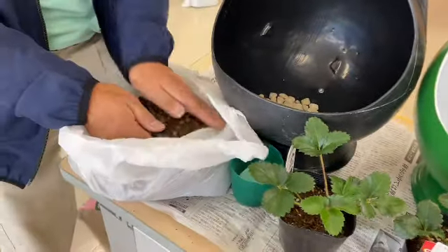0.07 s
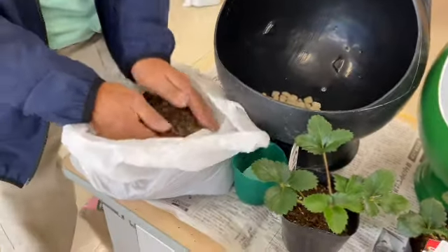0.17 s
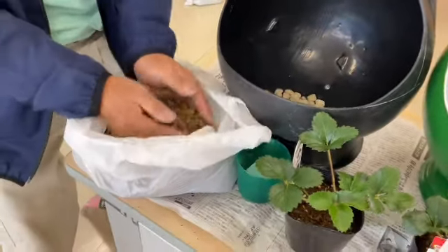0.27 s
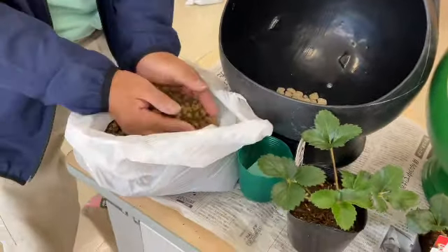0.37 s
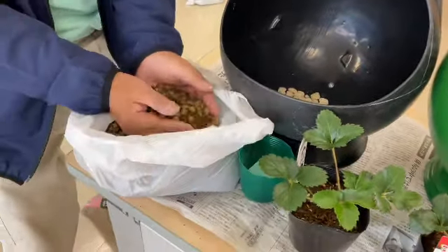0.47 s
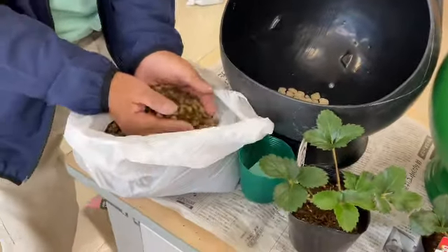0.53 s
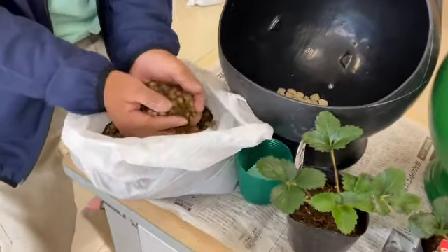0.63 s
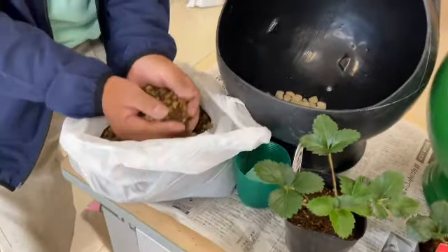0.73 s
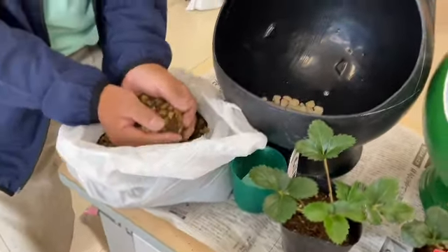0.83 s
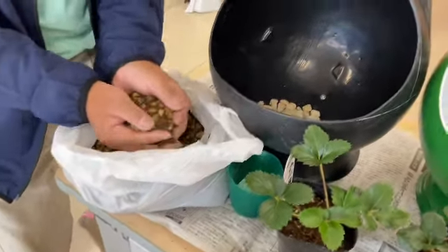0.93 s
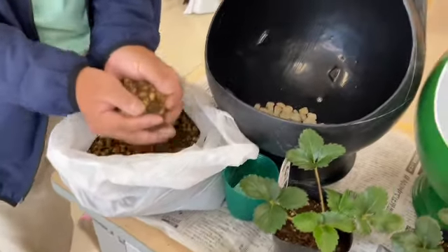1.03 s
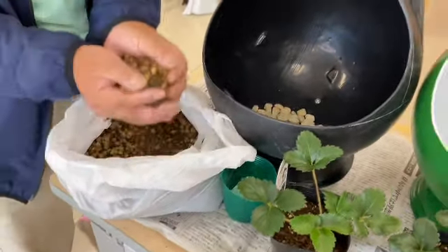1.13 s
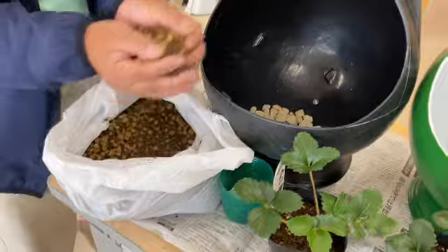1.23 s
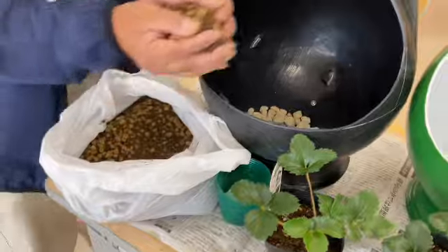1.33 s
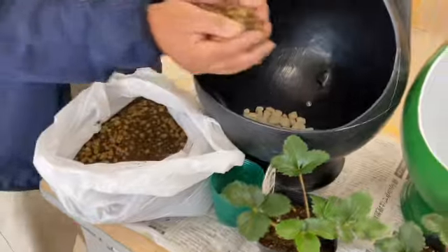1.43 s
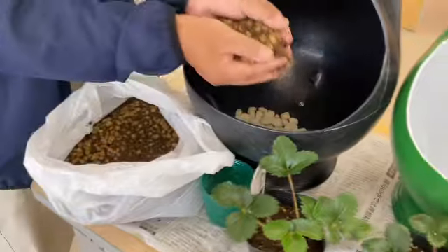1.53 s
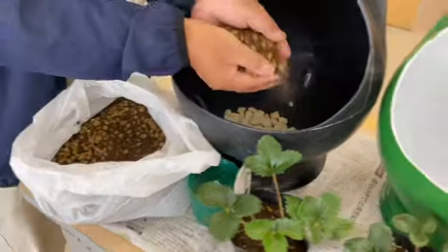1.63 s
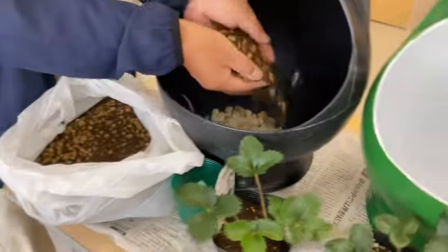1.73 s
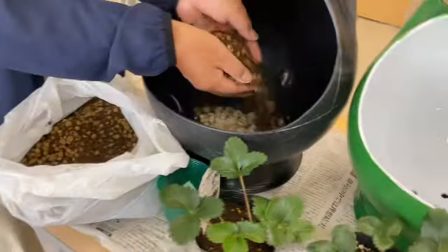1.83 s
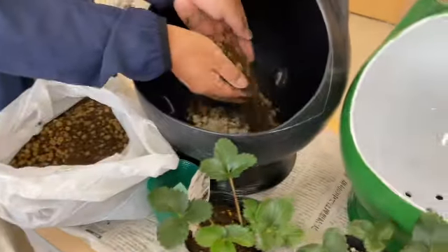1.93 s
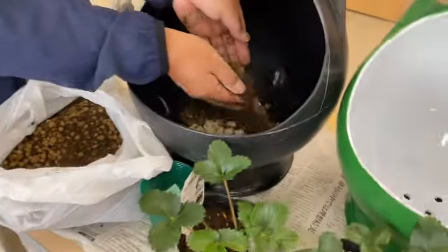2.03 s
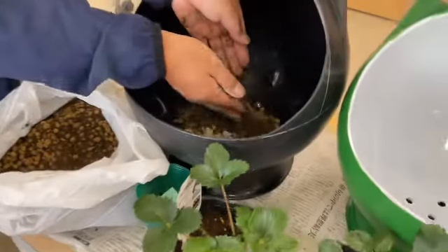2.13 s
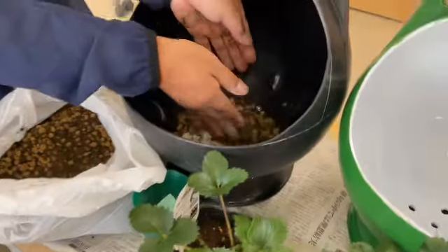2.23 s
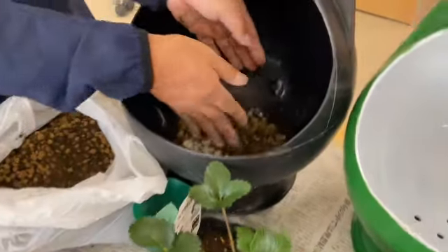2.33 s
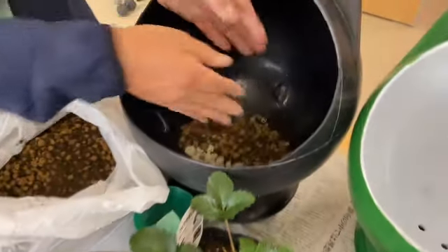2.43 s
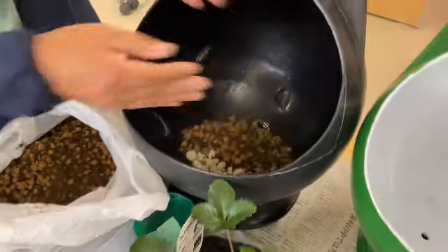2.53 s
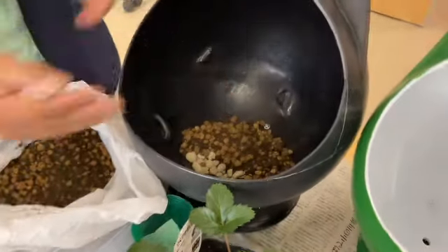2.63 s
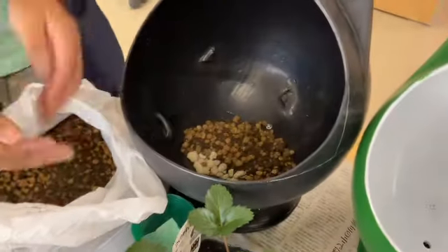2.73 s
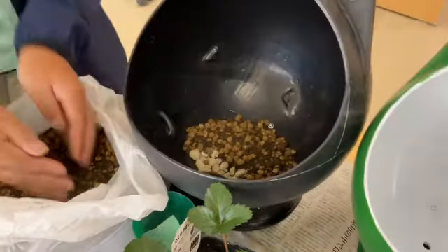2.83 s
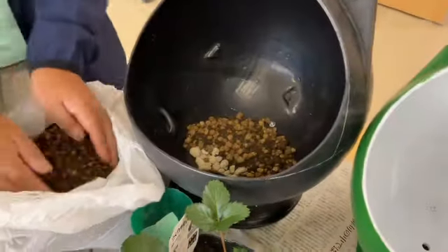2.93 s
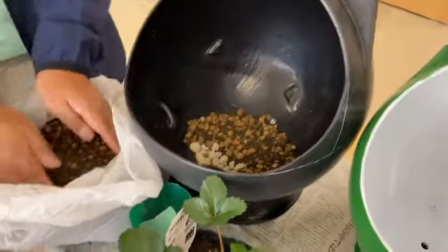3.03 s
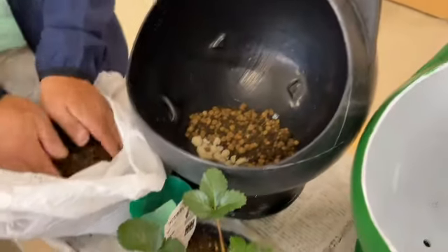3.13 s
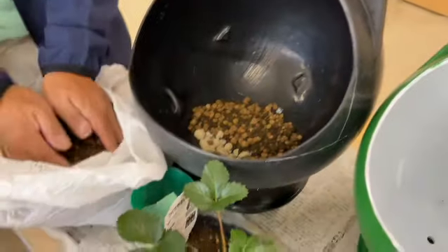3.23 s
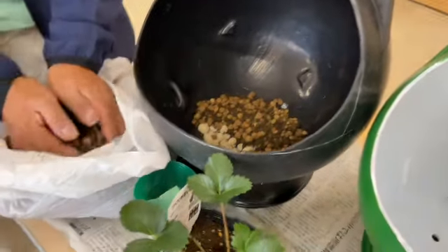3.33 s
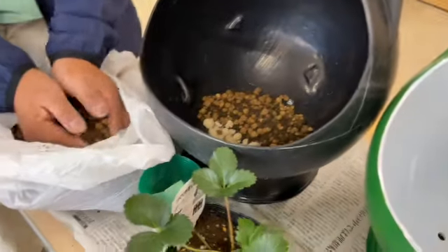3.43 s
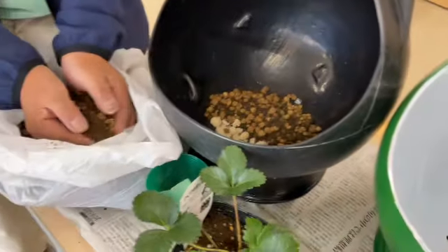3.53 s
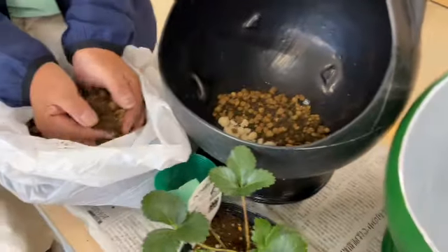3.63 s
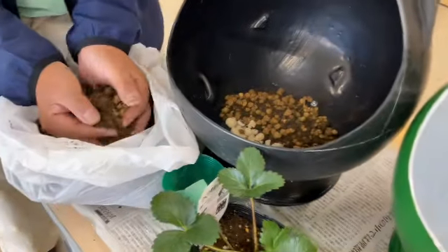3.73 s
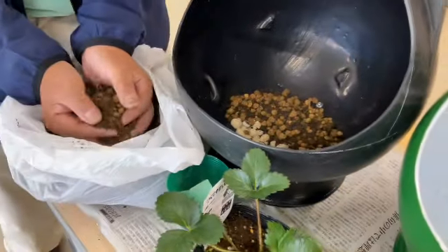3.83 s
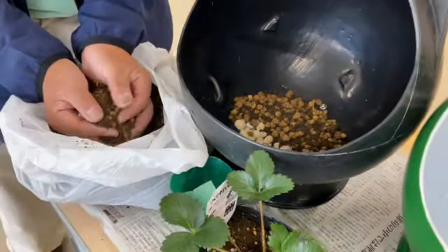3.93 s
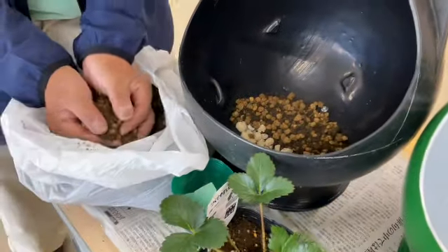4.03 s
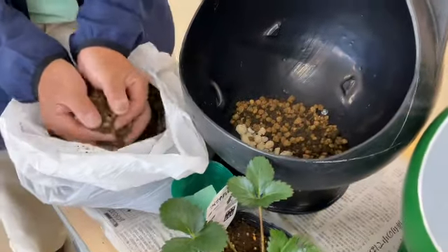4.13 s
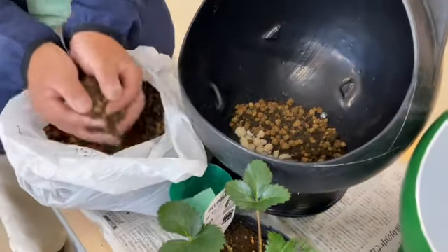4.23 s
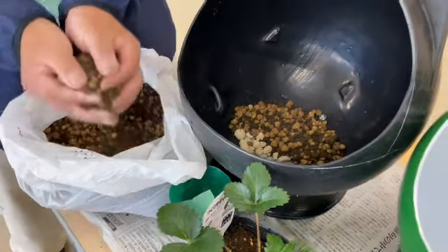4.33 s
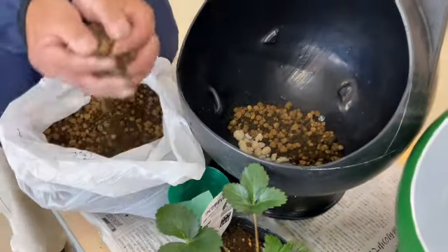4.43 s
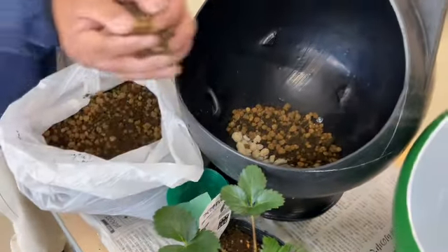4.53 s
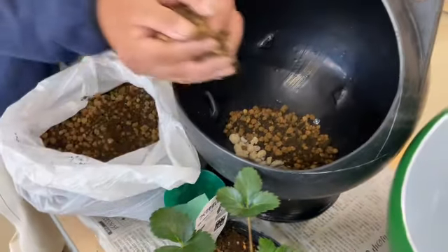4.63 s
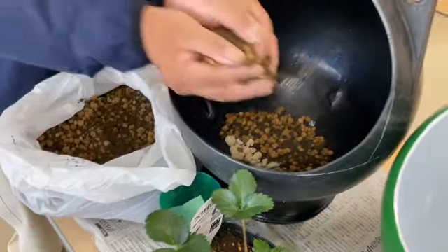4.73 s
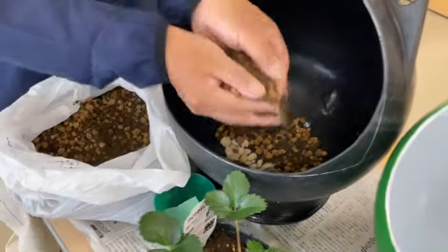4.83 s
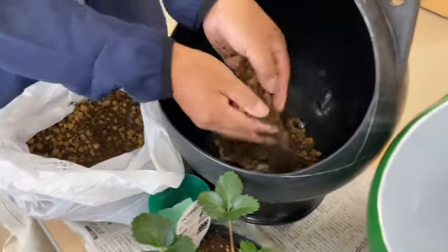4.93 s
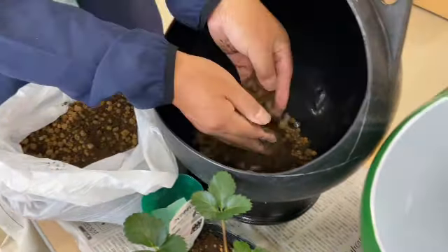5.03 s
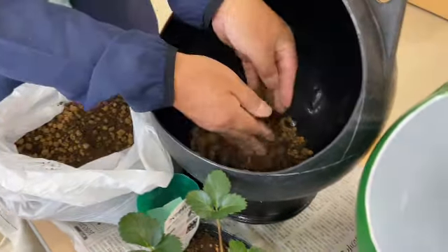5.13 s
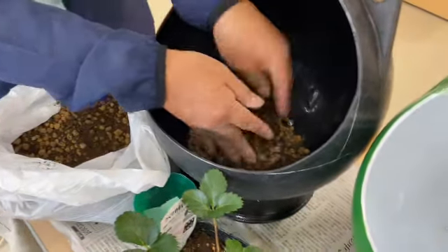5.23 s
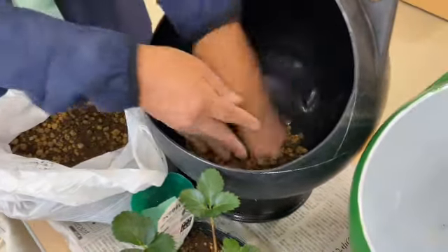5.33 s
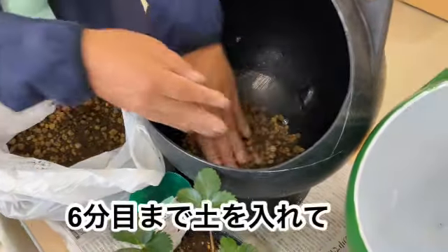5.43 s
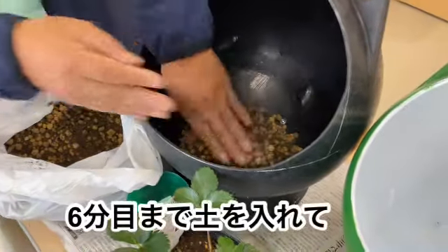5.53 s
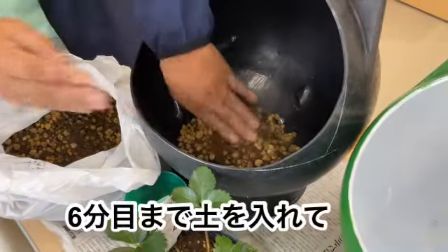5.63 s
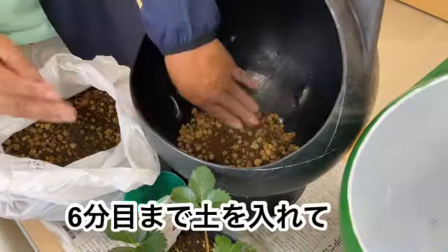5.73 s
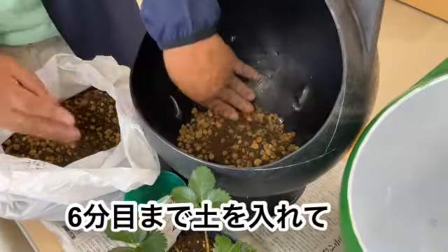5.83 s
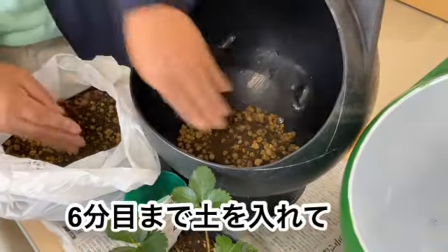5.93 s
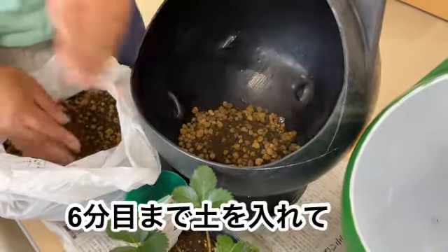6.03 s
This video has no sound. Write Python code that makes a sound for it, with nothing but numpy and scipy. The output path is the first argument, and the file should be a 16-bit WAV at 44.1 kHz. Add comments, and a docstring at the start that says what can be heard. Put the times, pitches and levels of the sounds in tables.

```python
"""Crisp, gritty crunching close to the microphone, then two hard clattering pours, over a low fan hum in a
small room. Two hands scoop potting soil from a plastic bag: dense random cracks crunch, and clods and single
grains snap. Twice soil drops into a hard plastic planter: granules make noisy clacks with ringing wall modes,
some loud enough to overload the microphone. Finer soil patters after them as short taps, soft knocks and short
squeaks sound as brief swelling tones, and soil rubbed along the wall sings as narrow resonant noise. The fan is
shaped noise and tones."""
import sys
import numpy as np
from scipy import signal
from scipy.fft import rfft, irfft
from scipy.io import wavfile

SR = 44100
rng = np.random.default_rng(int(sys.argv[2]) if len(sys.argv) > 2 else 0)


def generate_wav(signal):
    """Clip the signal to [-1, 1] and save it as 16-bit WAV at the path in sys.argv[1]."""
    frames = np.transpose(np.atleast_2d(signal))
    scaled = np.clip(frames, -1, 1) * 32767
    pcm = np.round(scaled).astype(np.int16)
    wavfile.write(sys.argv[1], SR, pcm)


N = 268745


def amp(db):
    """Decibels to gain."""
    return 10 ** (np.asarray(db) / 20)


def evened(x):
    """Scales to an rms of 1."""
    return x / np.sqrt(np.mean(x ** 2) + 1e-20)


def read(points, hz):
    """A table's value at hz, on a log-frequency axis."""
    table_hz, value = np.transpose(points)
    return np.interp(np.log(hz + 1), np.log(table_hz), value)


def add(mix, start_s, sound):
    """Mixes a sound in at its start time."""
    part = mix[max(round(start_s * SR), 0):][:len(sound)]
    part += sound[:len(part)]


def colour(x, gain_db, size=4096):
    """Causal minimum-phase filter whose gain in dB is a function of frequency."""
    log_gain = np.log(amp(gain_db(abs(np.fft.fftfreq(size, 1 / SR)))))
    spectrum = np.exp(np.conj(signal.hilbert(log_gain)))
    taps = np.fft.ifft(spectrum).real[:size // 2]
    return signal.oaconvolve(x, taps)[:len(x)]


def shelf(hz, centre_hz, octaves):
    """Octaves above a centre, levelling off on both sides."""
    return octaves * np.tanh(np.log2((hz + 1) / centre_hz) / octaves)


def band(hz, centre_hz, octaves):
    """dB gain of a broad hump around a centre."""
    return -10 * np.log10(1 + (np.log2((hz + 1) / centre_hz) / octaves) ** 4)


def shaped_noise(gain):
    """Noise of rms 1 whose spectrum follows a gain given as a function of frequency."""
    hz = np.fft.rfftfreq(N, 1 / SR)
    return evened(irfft(rfft(rng.standard_normal(N)) * gain(hz), N))


def drift(rate_hz):
    """Random wander of rms 1, mostly slower than the given rate."""
    return shaped_noise(lambda f: 1 / (1 + (f / rate_hz) ** 4))


def grains(per_s, spread_db):
    """Random clicks, many small and a few large."""
    size = amp(spread_db * np.minimum(rng.exponential(1, N), 4.5))
    sign = rng.choice([-1, 1], N)
    return size * sign * (rng.random(N) < per_s / SR)


def burst(t, t60):
    """A dying scatter of many overlapping resonances, made of decaying noise."""
    return rng.standard_normal(len(t)) * amp(-60 * t / t60)


def scattered(per_s, spread_db, t, t60, count):
    """Random grains shared among several different short bursts, so that they do not all sound alike."""
    return sum(signal.oaconvolve(grains(per_s / count, spread_db), burst(t, t60))[:N] for _ in range(count))


def swell(full_s, hold_s, rise_db_per_s, fade_db_per_s):
    """Gain that climbs to 1 at a given time, holds, and fades."""
    t = np.arange(N) / SR - full_s
    rise_db = rise_db_per_s * np.minimum(t, 0)
    fade_db = fade_db_per_s * np.maximum(t - hold_s, 0)
    return amp(np.maximum(rise_db - fade_db, -150))


# spectrum of the fan's air in the small room: pitch_hz, relative_level_db
FAN_AIR = [(36, -38), (54, -1.5), (70, -5.5), (100, -0.5), (135, 3), (210, -7), (265, -3), (320, -11),
           (380, -6), (600, -17.5), (850, -19.5), (2500, -26.5), (6000, -27), (15500, -31.5)]
# the fan's tones: pitch_hz, level_db (rms)
FAN_TONES = [(131, -49), (151, -46), (195, -44.5), (240, -50), (382, -53.5), (602, -56.5), (662, -64.5)]
FAN_AIR_DB = -38.5  # rms


def fan(waver_hz=1.19, flutter_db=0.3):
    """Low rush of air with a few tones that waver in pitch and level."""
    air = shaped_noise(lambda f: amp(read(FAN_AIR, f)))
    tones = np.zeros(N)
    for pitch_hz, level_db in FAN_TONES:
        gain = amp(level_db + flutter_db * drift(7.1))
        phase = 2 * np.pi * np.cumsum(pitch_hz + waver_hz * drift(5.2)) / SR
        tones += gain * np.sin(phase)
    return amp(FAN_AIR_DB) * air + np.sqrt(2) * tones


# hands pushing through the soil in the bag: full_push_s, hold_s, crunch_level_db, fade_db_per_s,
# fine_db (finest grit relative to the crunch)
STROKES = [(0.0, 0.0041, -21.5, 38.5, -5.5), (0.27, 0.022, -30.5, 42.5, -8), (0.519, 0.016, -30, 164, -3.5),
           (0.754, 0.029, -37, 163, -9), (0.91, 0.27, -45.5, 58, -6.5), (1.394, 0.13, -40, 40, -8),
           (2.436, .08, -44, 44, -8), (2.914, .12, -28.5, 42, -2.5), (3.188, 0.045, -32.5, 75, -7),
           (3.311, 0.12, -34.5, 32.5, -6), (3.986, 0.18, -41.5, 123, -4.5), (4.577, 0.29, -41, 122, -9),
           (5.36, 0.018, -43.5, 13, -11), (5.897, .02, -45.5, 63, -12), (6.088, .02, -39, 50, -9)]
# a push builds up at this rate and ends this long after its full push
PUSH_DB_PER_S, STROKE_S = 228, 0.77
RESTING_DB = -59  # soil resting in the hands still creaks faintly


def effort(let_go_s=0.04):
    """Level of the crunch and relative level of its finest grit, both in dB, as the strokes overlap."""
    t = np.arange(N) / SR
    power = np.full(N, amp(RESTING_DB) ** 2)
    fine_power = power * amp(STROKES[0][4]) ** 2
    for full_s, hold_s, level_db, fade, fine_db in STROKES:
        let_go = 0.5 * (1 - np.tanh((t - full_s - STROKE_S) / let_go_s))
        push = amp(level_db) * swell(full_s, hold_s, PUSH_DB_PER_S, fade) * let_go
        power = power + push ** 2
        fine_power = fine_power + (push * amp(fine_db)) ** 2
    return 10 * np.log10(power), 10 * np.log10(fine_power / power)


# spectrum of grit crunching in the bag: pitch_hz, relative_level_db
CRUNCH_SPECTRUM = [(40, -36), (120, -28), (300, -2), (600, 0.5), (1000, -4), (1500, -2.5), (2200, -1.5),
                   (3200, 0), (3900, -2), (4800, 3), (6000, 1), (8500, 0), (11000, -4.5), (15500, -6)]


def digging(level_db, fine_db, per_s=14000, spread_db=2.5, grain_t60=0.0035, clump_db=1.7,
            full_db=-27, fewest=0.12, usual_fine_db=-7, count=28):
    """Grit rubs on grit and bag: tiny cracks in clumps, dense under a hard push, sparser when gentle."""
    t = np.arange(256) / SR
    moving = np.clip(amp(level_db - full_db), fewest, 1)  # share of the grains that are moving
    cracks = scattered(moving * per_s, spread_db, t, grain_t60, count)
    # density alone does not set the loudness; level_db does that below
    clumped = cracks / np.sqrt(moving) * amp(clump_db * drift(60))
    crunch = colour(clumped, lambda f: read(CRUNCH_SPECTRUM, f))
    fine = signal.sosfiltfilt(signal.butter(2, 8500, "high", fs=SR, output="sos"), crunch)
    treble = signal.sosfilt(signal.butter(4, 3000, "high", fs=SR, output="sos"), crunch)
    fine_gain = amp(fine_db - usual_fine_db)
    # the level is reckoned on the crunch above 3 kHz
    return amp(level_db) * (crunch + (fine_gain - 1) * fine) / treble.std()


def loose_grit(effort_db, per_s=45, spread_db=3.0, tick_t60=0.01, pitch_hz=7500, octaves=1.0,
               level_db=-22, follows=0.72, count=8):
    """Stray grains tick at random, a little louder when the hands push harder."""
    t = np.arange(512) / SR
    ticks = scattered(per_s, spread_db, t, tick_t60, count)
    ticks = evened(colour(ticks, lambda f: band(f, pitch_hz, octaves)))
    return amp(level_db + follows * effort_db) * ticks


# clods crushed under the fingers: start_s, level_db (of the cracks, before the swell), pitch_hz, rise_s
CRUSHED_CLODS = [(0.05, -40, 1100, 0.0064), (1.243, -37, 2100, 0.0027), (2.998, -30.5, 1400, 0.0078),
                 (3.075, -33.5, 1410, 0.0035), (3.195, -41, 750, .014), (3.33, -33, 2300, 0.009),
                 (3.97, -41.5, 2200, 0.01), (4.622, -33, 6400, 0.0094)]


def crushes(per_s=2500, spread_db=5.5, octaves=0.62):
    """A clod gives way in a short swell of cracks."""
    out, t = np.zeros(N), np.arange(4096) / SR
    cracks = grains(per_s, spread_db)
    for start_s, level_db, pitch_hz, rise_s in CRUSHED_CLODS:
        crush = colour(cracks[round(start_s * SR):][:len(t)], lambda f: band(f, pitch_hz, octaves))
        envelope = t / rise_s * np.exp(1 - t / rise_s)
        add(out, start_s, amp(level_db) * evened(crush) * envelope)
    return out


# single grains snapping in the hands and the bag: start_s, level_db (first 2 ms), pitch_hz
GRAIN_TICKS = [(0.7193, -27, 10300), (0.946, -35, 6400), (1.1975, -33, 6170), (1.2841, -33, 7350),
               (1.348, -34, 7500), (1.401, -32, 11200), (1.4212, -31, 6760), (1.4645, -12.5, 5900),
               (2.7372, -31.5, 7850), (2.8111, -30.5, 7250), (3.0123, -21, 5440), (3.554, -28.5, 8300),
               (3.7149, -27, 5730), (3.7415, -35, 4650), (3.869, -32, 6000), (4.313, -35.5, 7800),
               (4.435, -29.5, 10000), (4.4915, -31, 7050)]


def grit_ticks(tick_t60=0.0085, octaves=0.61):
    """Single grains crack with a dry, very short tick, each around its own pitch."""
    out, t = np.zeros(N), np.arange(1024) / SR
    attack = slice(SR // 500)
    for start_s, level_db, pitch_hz in GRAIN_TICKS:
        tick = colour(burst(t, tick_t60), lambda f: band(f, pitch_hz, octaves))
        add(out, start_s, amp(level_db) * tick / tick[attack].std())
    return out


# handfuls running into the planter: full_flow_s, hold_s, level_db, rise_db_per_s
POURS = [(1.759, .28, -20.5, 193), (4.899, 0.11, -23.5, 900)]
# the flow stops quickly as the hands empty; a weaker dribble dies away after it
STOP_DB_PER_S, DRIBBLE_DB, DRIBBLE_DB_PER_S = 207, -7.5, 40


def flow():
    """How strongly soil runs into the planter: each handful gushes, then dribbles."""
    total = np.zeros(N)
    for full_s, hold_s, level_db, rise in POURS:
        gush = swell(full_s, hold_s, rise, STOP_DB_PER_S)
        dribble = amp(DRIBBLE_DB) * swell(full_s, hold_s, rise, DRIBBLE_DB_PER_S)
        total += amp(level_db) * np.maximum(gush, dribble)
    return total


def poured_granules(over_flow_db=2, spread_db=2.5, bright_db=3.0, bright_spread_db=3,
                    harder=0.41, usual_db=-20, count=30):
    """Granules land unevenly through each pour, as hard as the flow is strong; harder is brighter."""
    gap_s, strength, rows = 0.018, flow(), []
    for full_s, *_ in POURS:
        times = full_s + gap_s * (np.arange(count) - 1 + rng.random(count))
        size, tone = np.clip(rng.standard_normal((2, count)), -2, 2)
        flow_db = 20 * np.log10(strength[(times * SR).astype(int)])
        level_db = flow_db + over_flow_db + spread_db * size
        brightness = bright_db + harder * (level_db - usual_db) + bright_spread_db * tone  # dB per octave
        rows += zip(times, level_db, brightness)
    return rows


# the planter's hard plastic wall: pitch_hz, relative_level_db, t60_s
WALL_MODES = [(1157, 4, 0.081), (1263, -0.5, 0.059), (1280, 4, 0.15), (1504, -13, .045), (1767, 8.5, 0.084),
              (2226, -9, 0.18), (2820, -30, 0.037), (2972, 12, 0.053), (3290, -11, 0.052),
              (4390, -3, 0.036), (4520, -4, 0.04), (6030, -1, 0.027)]


def wall_ring(t):
    """The wall's modes ring and die, each with a random strength for the spot that is struck."""
    pitch_hz, level_db, t60_s = np.transpose(WALL_MODES)[:, :, None]
    spot = rng.standard_normal(pitch_hz.shape)
    modes = spot * amp(level_db - 60 * t / t60_s) * np.sin(2 * np.pi * pitch_hz * t)
    return modes.sum(0)


# single granules striking the planter, loud and soft: start_s, level_db (first 4 ms),
# brightness_db_per_octave
PLACED_GRANULES = [(1.5314, -28.5, 1), (1.6526, -10, 5), (1.6862, -28, 9), (1.7112, -10.5, 3),
                   (1.7138, -7.5, 5), (1.721, -15, -0.5), (1.752, -19, 11), (1.767, -10.5, -10),
                   (1.771, -6, 8), (1.7919, -3.5, 0.5), (1.8024, -2.5, 3.5), (1.805, -7.5, 2.5),
                   (1.8359, -11.5, 6), (1.8483, -6.5, -0.5), (1.856, -9, 0), (1.895, -12, 0.5),
                   (1.9022, -12.5, 6), (1.9239, -8.5, -0.5), (1.9462, -10.5, 4), (1.9558, -8, 7.5),
                   (1.9644, -10, 5), (1.9973, -6.5, 10.5), (2.0486, -13.5, -2.5), (2.056, -17.5, -6),
                   (2.107, -17, 1), (2.1791, -13.5, 0), (2.2355, -21.5, 2.5), (2.364, -28.5, 4),
                   (2.4085, -31.5, -3), (2.4924, -34.5, -2), (4.882, -11.5, -2.5), (4.8931, -5, 8.5),
                   (4.9228, -18, -4), (4.944, -9.5, 4.5), (4.9673, -7.5, 9.5), (4.973, -6, 6),
                   (4.978, -25, 14), (4.9903, -17.5, -1), (4.998, -14.5, 7.5), (5.0598, -24, 2),
                   (5.1556, -20, 0), (5.2, -29, 5), (5.4099, -26.5, -7.5), (5.474, -31.5, -2),
                   (5.7916, -24, 4.5), (5.799, -23.5, -17)]
# the clack's low resonances sit lower during each pour, most in the second: time_s, low_pitch_factor (ratio)
LOW_PITCH = [(1.8, 0.91), (2.3, 1), (4.9, 0.7), (5.3, 0.89)]
# spectrum of a granule's clack: pitch_hz, relative_level_db
CLACK_SPECTRUM = [(60, -23), (250, -25.5), (450, -19), (740, -16.5), (930, -15.5), (1120, 0), (1800, 3.5),
                  (2300, -0.5), (3000, -1.5), (5200, -3.5), (7500, -13), (10000, -23), (15500, -33)]


def granule_hits(clack_t60=0.029, ring_db=-9, spread_s=0.00023):
    """Each granule gives a hard clack that spreads through the wall, which rings on briefly."""
    out, t = np.zeros(N), np.arange(4096) / SR
    attack = slice(SR // 250)
    for start_s, level_db, bright in [*PLACED_GRANULES, *poured_granules()]:
        low = np.interp(start_s, *np.transpose(LOW_PITCH))
        clack = burst(t, clack_t60) * (1 - np.exp(-t / spread_s))
        # the factor acts fully on low frequencies and fades out around 4 kHz and above
        clack = colour(clack, lambda f: read(CLACK_SPECTRUM, f / (low + (1 - low) * f / (f + 4000))))
        ring = wall_ring(t)
        hit = clack / clack[attack].std() + amp(ring_db) * ring / ring[attack].std()
        hit = colour(hit, lambda f: bright * shelf(f, 4600, 1.58))
        add(out, start_s, amp(level_db) * hit / hit[attack].std())
    return out


# soft knocks and short squeaks on the planter (those near 1.15 kHz are squeaks): start_s, peak_level_db,
# pitch_hz, rise_s
KNOCKS_AND_SQUEAKS = [(1.533, -28.5, 636, .002), (2.134, -20, 1170, 0.0041), (2.2066, -13, 1155, 0.0044),
                      (2.259, -17, 1154, 0.0018), (2.456, -17, 340, 0.0021), (5.812, -26, 160, 0.0071)]


def knocks_and_squeaks():
    """Soft blows and short squeaks: single tones that swell and die quickly."""
    out, t = np.zeros(N), np.arange(4096) / SR
    for start_s, peak_db, pitch_hz, rise_s in KNOCKS_AND_SQUEAKS:
        envelope = (t / rise_s * np.exp(1 - t / rise_s)) ** 2
        add(out, start_s, amp(peak_db) * envelope * np.sin(2 * np.pi * pitch_hz * t))
    return out


# spectrum of fine soil on the planter's wall: pitch_hz, relative_level_db
FINES_SPECTRUM = [(100, -30), (350, -9), (600, -10), (830, -16), (1170, 2), (1800, -3), (2600, -5.5),
                  (3500, -6.5), (5200, -7.5), (7400, -12.5), (10000, -17.5), (15500, -23)]


def trickle(per_s=600, spread_db=2.0, count=24):
    """Small grains patter on many spots of the wall, each a short dry tap."""
    t, tap_t60 = np.arange(1024) / SR, 0.012
    patter = scattered(per_s, spread_db, t, tap_t60, count)
    return flow() * evened(colour(patter, lambda f: read(FINES_SPECTRUM, f)))


# soil rubbed along the wall makes it sing: full_s, hold_s, level_db, fade_db_per_s, pitch_hz, glide_hz_per_s
WALL_RUBS = [(1.925, .01, -23, 56, 1172, -220), (4.919, 0.077, -34, 110, 825, 0),
             (5.19, .01, -40.5, 170, 850, 0), (5.71, 0.083, -50, 100, 1153, 200.5)]
RUB_RISE_DB_PER_S = 255


def rubbing(width_hz=170, slips_per_s=500, throb_db=2.5):
    """Random slips of uneven strength excite a narrow resonance, shifted to each rub's gliding pitch."""
    t, out = np.arange(2048) / SR, np.zeros(N)
    slips = grains(slips_per_s, 3.6) * amp(throb_db * drift(37)) * np.exp(2j * np.pi * rng.random(N))
    ringing = signal.oaconvolve(slips, t * np.exp(-2 * np.pi * width_hz * t))[:N]  # centred on 0 Hz
    for full_s, hold_s, level_db, fade, pitch_hz, glide in WALL_RUBS:
        gliding_hz = pitch_hz + glide * (np.arange(N) / SR - full_s)
        carrier = np.exp(2j * np.pi * np.cumsum(gliding_hz) / SR)
        song = evened((ringing * carrier).real)
        out += amp(level_db) * swell(full_s, hold_s, RUB_RISE_DB_PER_S, fade) * song
    return out


# the small room's reverberation: pitch_hz, t60_s
ROOM_DECAY = [(300, 0.59), (1200, 0.22), (5000, 0.19), (15000, 0.22)]


def room(x, delay_s=0.0028):
    """A short diffuse tail of decaying noise whose bass lasts longest."""
    hz, t, z = signal.stft(rng.standard_normal(SR // 3), SR, nperseg=256)
    decay = amp(-60 * t / read(ROOM_DECAY, hz)[:, None])
    tail = signal.istft(z * decay, SR, nperseg=256)[1]
    tail = tail * (np.arange(len(tail)) > delay_s * SR)
    return signal.oaconvolve(x, tail / np.linalg.norm(tail))[:N]


def scene(planter_room_db=-14, bag_room_db=-13):
    """The planter and the bag, close by, over the fan."""
    planter = granule_hits() + trickle() + rubbing() + knocks_and_squeaks()
    effort_db, fine_db = effort()
    bag = digging(effort_db, fine_db) + crushes() + grit_ticks() + loose_grit(effort_db)
    reverberation = room(amp(planter_room_db) * planter + amp(bag_room_db) * bag)
    return (planter + bag + reverberation + fan())[None]


EDGE_HZ = 15800  # upper band limit


def record(dry):
    """The microphone overloads and clips the loudest peaks; then a low-pass limits the band."""
    clipped = np.clip(dry, -1, 1)
    low_pass = signal.firwin(511, EDGE_HZ, window=("kaiser", 8), fs=SR)
    return signal.oaconvolve(clipped, low_pass[None], "same")


dry = scene()
out = record(dry)
generate_wav(out)
```